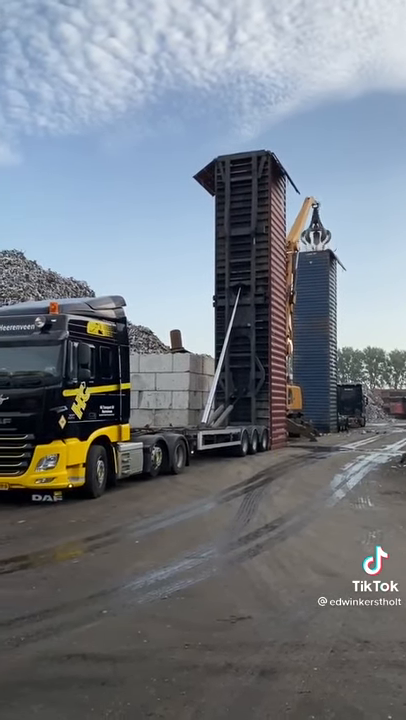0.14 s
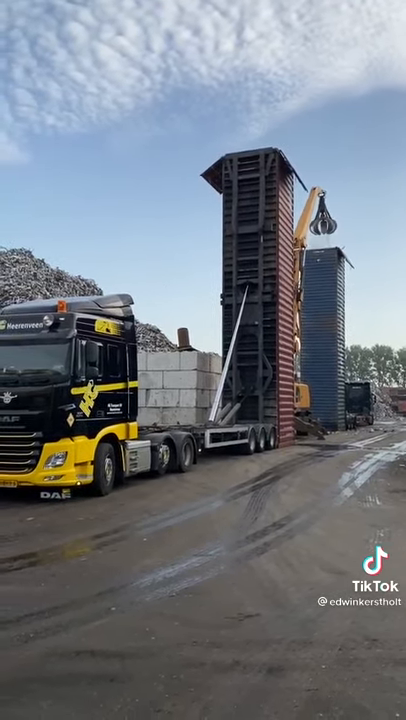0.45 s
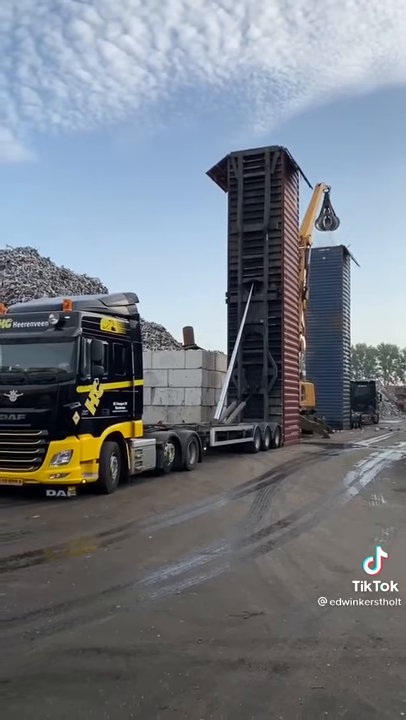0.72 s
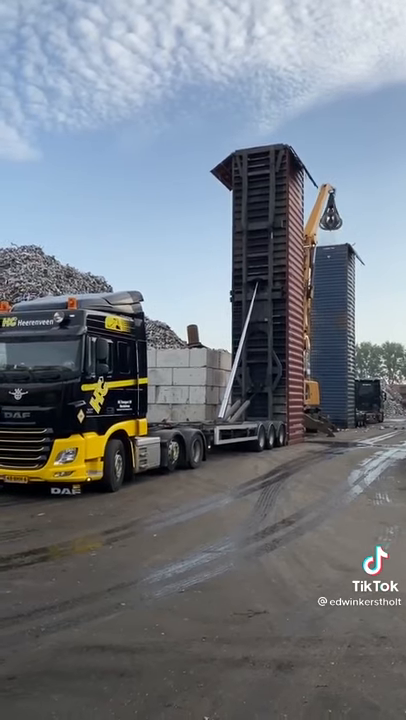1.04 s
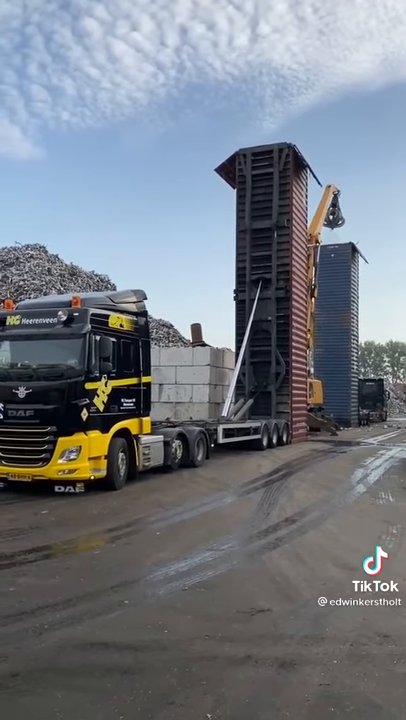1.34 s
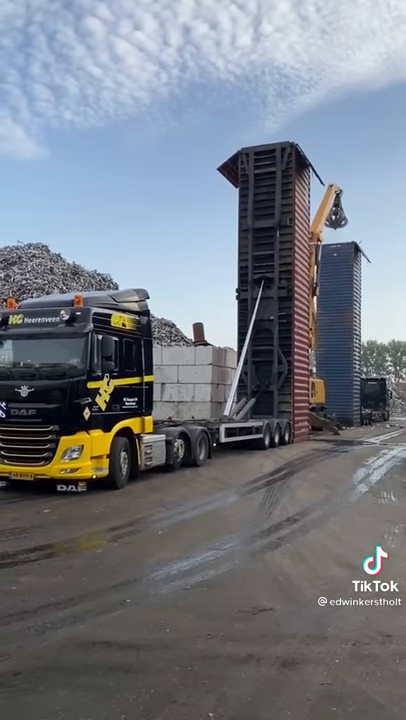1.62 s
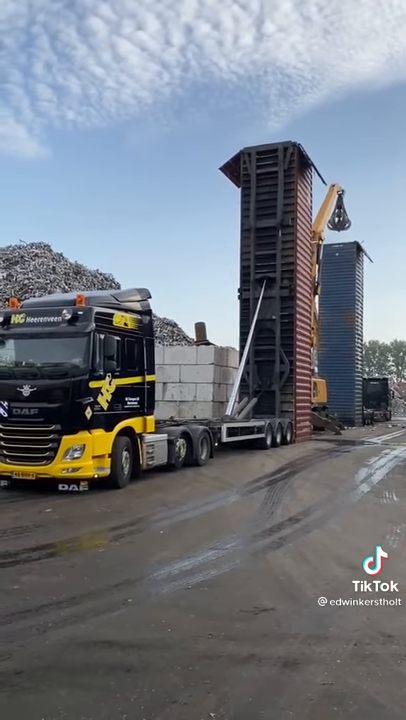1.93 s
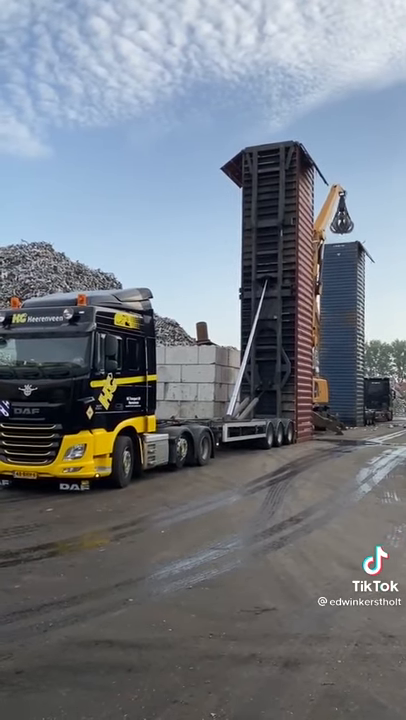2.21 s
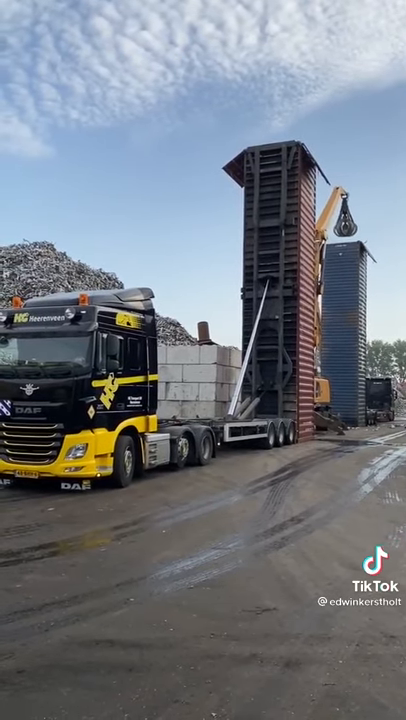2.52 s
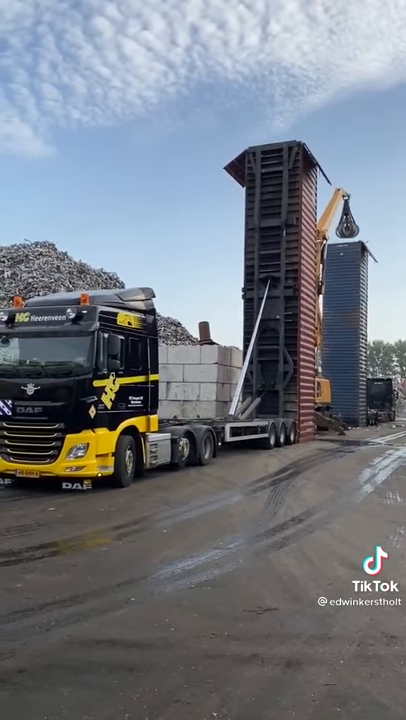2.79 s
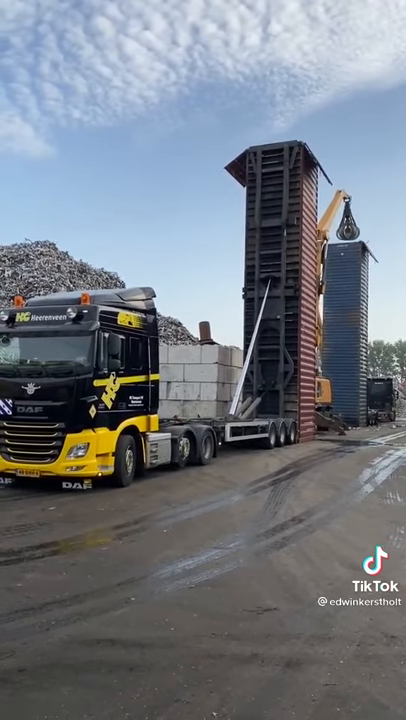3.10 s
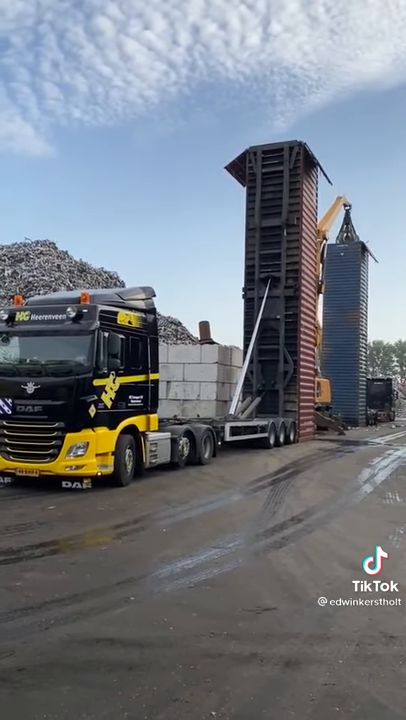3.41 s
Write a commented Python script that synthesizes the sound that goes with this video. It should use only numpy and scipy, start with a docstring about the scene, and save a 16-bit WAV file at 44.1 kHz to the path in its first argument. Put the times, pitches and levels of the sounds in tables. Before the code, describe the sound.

Scrap metal crashes in a tall hollow steel container at about 0.9 seconds: three rapid clattering blows to 1.1, with sharp clinks, a strong clang and low boom, then stragglers to 1.3 and a yard echo. Throughout, diesel engines drone and rumble with a faint fan tone under hiss that swells and sinks, strongest near the start and 3.4. Dull low bumps come around 2.0 and 2.4. Outdoor phone pickup.

```python
"""A scrapyard: diesel engines drone under a hiss that swells and sinks, probably a crane's hydraulics.
Just before one second, scrap tumbles in an upended steel container: three clattering, booming blows,
hard clinks and a few stragglers, made of noise bursts and decaying tones. The yard echoes.
From about two seconds the machines add dull low bumps.
Two closely spaced microphone ports hear nearly all of it from one side."""
import sys
import numpy as np
from scipy import signal
from scipy.fft import rfft, irfft, next_fast_len
from scipy.io import wavfile
from scipy.ndimage import uniform_filter1d, map_coordinates

SR = 44100
rng = np.random.default_rng(int(sys.argv[2]) if len(sys.argv) > 2 else 0)


def wrap_up_sound(samples):
    """Save the sound to the file named by the first command line argument, as 16-bit audio."""
    columns = np.atleast_2d(samples).T
    # keep every value between -1 and 1, then stretch to whole-number steps
    tamed = np.clip(columns, -1, 1)
    steps = np.round(tamed * 32767).astype(np.int16)
    wavfile.write(sys.argv[1], SR, steps)


N = 156555  # length in samples


def amp(db):
    """Decibels to gain."""
    return 10 ** (np.asarray(db) / 20)


def unit(x):
    """Scale to rms 1."""
    return x / np.sqrt(np.mean(x ** 2) + 1e-20)


def along(points, hz):
    """Read a curve of (Hz, value) points on a log frequency axis."""
    point_hz, values = np.transpose(points)
    return np.interp(np.log(hz + 1), np.log(point_hz + 1), values)


def curves(rows):
    """One value per sample for each column after the time."""
    seconds, *columns = np.transpose(rows)
    return [np.interp(np.arange(N) / SR, seconds, column) for column in columns]


def wobble(rate):
    """A smooth random curve with this many knots a second."""
    coarse = np.arange(0, N + 64, 64)
    knots = rng.standard_normal(400)
    curve = map_coordinates(knots, [coarse * rate / SR], mode="mirror")
    return np.interp(np.arange(N), coarse, curve)


def filtered(x, response):
    """Multiply the spectrum of x by a complex response of frequency."""
    size = next_fast_len(N + SR // 2)
    spectrum = rfft(x, size) * response(np.fft.rfftfreq(size, 1 / SR))
    return irfft(spectrum, size)[..., :N]


def tilt(hz):
    """Left and right gains at equal total power."""
    # Each row: frequency in Hz, left minus right in dB.
    balance = [(110, 0), (200, -3.2), (350, -9), (680, -2.5), (1250, 0), (2300, -1), (7000, 0)]
    gains = amp(np.array([[.5], [-.5]]) * along(balance, hz))
    return gains / np.sqrt(np.mean(gains ** 2, axis=0))


def ports(x):
    """Phase and level differences between the two ports."""
    # Each row: frequency in Hz, lead of the left port in radians.
    left_lead = [(100, 0), (180, -.3), (340, -1), (460, -2.1), (750, -3.4), (1300, -4.2), (2900, -4.6),
                 (3600, -5.9), (5300, -6.2), (6500, -3.3), (7900, -3.2), (9200, -5.2), (12000, -6.2),
                 (14000, -5.5)]

    def response(hz):
        return np.exp(np.array([[.5j], [-.5j]]) * along(left_lead, hz)) * tilt(hz)

    return filtered(x, response)


def diffuse(pair):
    """Mix two unrelated signals into one partly coherent sound field at the ports."""
    # How alike the ports sound. Each row: frequency in Hz, coherence from 0 to 1.
    coherence = [(110, 1), (200, .95), (330, .72), (440, .2), (620, .5), (820, .7), (1300, .45), (1800, .3),
                 (2400, .6), (4200, .65), (5100, .8), (6000, .55), (7200, .55), (9000, .4), (12000, .6)]

    def shares(hz):
        turn = np.arccos(np.clip(along(coherence, hz), 0, 1)) / 2
        return np.array([np.cos(turn), np.sin(turn)])

    common, opposed = filtered(pair, shares)
    return ports(np.array([common + opposed, common - opposed]))


def noise(spectrum, patchy_db):
    """Stereo noise of rms 1, with patches of random gain over time and frequency."""
    cells = signal.stft(rng.standard_normal((2, N)), nperseg=512)[2]
    patches = uniform_filter1d(rng.standard_normal(cells.shape[1:]), size=5, axis=0)
    patches = uniform_filter1d(patches, size=12, axis=1)
    pair = signal.istft(cells * amp(patchy_db * unit(patches)), nperseg=512)[1][:, :N]
    colored = filtered(pair, lambda hz: amp(along(spectrum, hz)))
    return unit(diffuse(colored))


def engines():
    """Unsteady engine tones, a fan tone and low rumble over the yard's broadband roar."""
    # Low engine tones. Each row: frequency in Hz, rms level in dB.
    low_tones = [(55, -45), (85, -45), (108.5, -48.5)]
    # Strongest engine tone. Each row: time in seconds, rms level in dB.
    hum_level = [(.12, -49.5), (.25, -37.5), (.7, -39.5), (1.5, -46.5), (1.7, -39), (2.0, -46.5),
                 (2.7, -39.5), (3.0, -47), (3.17, -36.5), (3.55, -41.5)]
    # Fan tone. Each row: time in seconds, level before the trim in dB.
    fan_level = [(0, -42.5), (.55, -48), (.7, -38.5), (.82, -32), (.92, -47), (1.2, -44), (2.2, -41.5),
                 (2.4, -37), (2.75, -32), (2.87, -40.5), (3.55, -42)]
    # Rumble. Each row: time in seconds, level before the trim in dB.
    rumble_level = [(0, -36), (.4, -34), (.65, -39), (.92, -29.5), (1.15, -36), (1.5, -44), (1.68, -30),
                    (1.85, -40), (2.0, -37), (2.22, -35), (2.42, -39), (2.6, -29.5), (3.0, -39.5),
                    (3.55, -36.5)]
    # Color of the rumble. Each row: frequency in Hz, relative density in dB per Hz.
    rumble_color = [(15, -21), (32, -2), (55, 9.5), (90, 2), (130, 1.5), (250, -2), (500, -44)]
    # The yard's roar. Each row: time in seconds, rms level in dB.
    roar_level = [(0, -29.5), (.6, -33), (1.5, -32), (2.3, -29.5), (2.95, -33.5), (3.5, -31)]
    # Color of the roar. Each row: frequency in Hz, relative density in dB per Hz.
    roar_color = [(20, -11), (40, -6), (100, 2), (200, -0.5), (340, 0.5), (430, -6), (560, -2.5), (800, -4),
                  (1100, -4), (1700, -14.5), (2500, -13), (4000, -30.5), (6000, -87.5), (9000, -48.5),
                  (14000, -35)]
    hum_hz, fan_hz = 163, 308.3
    speed_drift, fan_drift = 0.0089, 0.00473  # shares of speed
    fan_trim_db, fan_flutter_db, rumble_trim_db = 0.5, 1.5, -3.5

    # the engine tones share one drifting clock
    clock = np.cumsum(1 + speed_drift * wobble(5.1)) / SR
    drone = np.zeros(N)
    for hz, db in low_tones:
        level = amp(db + 1.9 * wobble(5.9))
        drone += level * np.sin(2 * np.pi * (hz * clock + rng.random()))
    hum = amp(curves(hum_level)[0]) * np.sin(2 * np.pi * hum_hz * clock)

    fan_phase = 2 * np.pi * np.cumsum(fan_hz * (1 + fan_drift * wobble(7.6))) / SR
    fan_db = curves(fan_level)[0] + fan_trim_db + fan_flutter_db * wobble(12)
    fan = amp(fan_db) * np.sin(fan_phase)

    rumble = amp(curves(rumble_level)[0] + rumble_trim_db) * noise(rumble_color, patchy_db=1.0)
    roar = amp(curves(roar_level)[0]) * noise(roar_color, patchy_db=1.76)
    tones = np.sqrt(2) * (drone + hum + fan)  # turns rms levels into sine peaks
    return ports(tones) + rumble + roar


def hiss():
    """A midrange rush and a treble hiss, two bands of noise that swell and sink together."""
    # Each row: time in seconds, level of the rush and level of the treble, both before trims in dB.
    swells = [(0, -37, -35), (.1, -35, -36), (.28, -35, -39.5), (.42, -39.5, -43), (.62, -48.5, -46.5),
              (.85, -44.5, -47), (1.42, -50.5, -46.5), (1.58, -38, -42.5), (1.74, -34, -39.5),
              (1.95, -39.5, -44.5), (2.08, -38, -41.5), (2.32, -46.5, -46), (2.53, -37, -42.5),
              (2.8, -45, -48.5), (3.12, -38.5, -41), (3.295, -39, -44), (3.32, -34, -37),
              (3.43, -32, -33.5), (3.55, -35.5, -38)]
    # Color of the rush. Each row: frequency in Hz, relative density in dB per Hz.
    rush_color = [(200, -10.5), (600, -3.5), (1200, -1), (1750, -2), (2300, 1.5), (3000, -1.5),
                  (3800, -7.5), (6000, -53), (15000, -110)]
    # Color of the treble. Each row: frequency in Hz, relative density in dB per Hz.
    treble_color = [(1500, -30), (3100, -3), (4200, 0), (5200, 1), (6300, 1.5), (7200, -22), (8200, -5),
                    (9500, -11), (11000, -14.5), (14000, -19.5)]
    rush_trim_db, treble_trim_db, treble_flutter_db = 3.5, 1.5, 0.4

    rush_db, treble_db = curves(swells)
    rush = amp(rush_db + rush_trim_db) * noise(rush_color, patchy_db=2)
    treble_db = treble_db + treble_trim_db + treble_flutter_db * wobble(21.85)
    return rush + amp(treble_db) * noise(treble_color, patchy_db=2.0)


def ring(modes, t, clock, blur, scatter_db):
    """Decaying modes pitched by the clock's pace; rattling pieces make strength and phase wander."""
    out = np.zeros((2, len(t)))
    for hz, db, t60, left_lead in modes:
        phase = 2 * np.pi * (hz * clock + rng.random()) + blur * wobble(57.0)[:len(t)]
        level = amp(db + scatter_db * wobble(57.0)[:len(t)] - 60 * t / t60)
        out += level * np.sin(phase + left_lead * np.array([[.5], [-.5]]))
    return out


def contact_spikes():
    """Random contacts of uneven strength, each a jump that dies away; their powers add up."""
    contacts = (rng.random(N) < 500 / SR) * amp(2 * rng.standard_normal(N))  # about 500 a second
    keep = np.exp(-1 / (0.019 * SR))  # power fades with a 19 ms time constant
    return unit(np.sqrt(signal.lfilter([1], [1, -keep], contacts ** 2)))


def crash():
    """Heaps of contacts: heavy pieces thud, loose ones clatter and spray, wall and hollow ring."""
    # Falling scrap. Each row: start in seconds, then levels in dB of thud, clatter, wall ring, clang
    # and boom, spread of the contacts in seconds, clang pitch as a ratio.
    blows = [(.888, -19.5, -21.5, -26, -26, -36, .035, 0.93),
             (.907, -38, -24, -27.5, -36, -33, 0.037, 1.03),
             (.96, -23, -20.5, -21.5, -19, -23.5, .03, .985), (1.0, -26, -25, -31, -24.5, -34, 0.041, .975),
             (1.054, -23, -21.5, -20, -10.5, -25, 0.019, 1.005),
             (1.14, -32, -33.5, -31, -35, -31.5, 0.028, .96),
             (1.291, -38, -37.5, -38, -33.5, -44, 0.042, 0.95)]
    # Container wall. Each row: mode in Hz, relative level in dB, t60 in seconds, left lead in radians.
    wall_modes = [(602, -3.5, 0.15, -2.5), (796, -10, 0.11, 5), (877, -8, 0.21, 4), (1225, -14, .2, -2),
                  (1300, -16, 0.2, 5), (1391, -8.5, .16, 1.5), (1600, -11, 0.11, 4),
                  (1727, -9.5, 0.28, -1.5), (1800, -11.5, 0.23, 1), (1955, -15.5, 0.22, 2.5),
                  (2135, -7, 0.19, 1.5), (2197, -9, 0.3, 2.5), (2590, -13, 0.3, 1.5)]
    # The wall's strongest mode, which each blow stirs differently. Each row: frequency in Hz before
    # pitch ratio and sag, relative level in dB, t60 in seconds, left lead in radians.
    clang_mode = [(983, -1, .17, -1.45)]
    # Air in the container. Each row: mode in Hz, relative level in dB, t60 in seconds,
    # left lead in radians.
    air_modes = [(141.5, -2, 0.55, -.25), (233, -4, 0.33, -0.82), (264.3, -1.5, 0.41, -0.63),
                 (278, -9.5, 0.74, -1.05), (335.3, -3, 0.34, -0.78)]
    # Color of heavy pieces. Each row: frequency in Hz, relative density in dB per Hz.
    thud_color = [(50, -25), (130, -8), (270, 0), (370, -1), (460, -12.5), (610, -2), (800, -16),
                  (1200, -27), (4000, -63)]
    # Color of loose pieces. Each row: frequency in Hz, relative density in dB per Hz.
    scrap_color = [(150, -27), (450, -12), (620, 2.5), (850, 1), (1120, 1), (1400, -3.5), (2200, -5.5),
                   (3000, -21), (4200, -31), (8000, -61)]
    # Color of fine shreds. Each row: frequency in Hz, relative density in dB per Hz.
    spray_color = [(1200, -20), (3100, 3.5), (4200, -4), (5600, -3), (7200, -45), (9000, -17), (14000, -35)]
    rise_s, contact_t60, spray_db = .008, 0.14, -12.5
    # the clang's pitch sinks from settled + sag to settled, with this time constant in seconds
    sag, sag_s, settled = .05, 0.097, 0.95

    power, steel = np.zeros((2, N)), np.zeros((2, N))
    for start, thud_db, clatter_db, ring_db, clang_db, boom_db, spread, pitch in blows:
        t = np.maximum(np.arange(N) / SR - start, 0)
        rise = 1 - np.exp(-t / rise_s)
        fall_db = 60 * np.maximum(t - spread, 0) / contact_t60
        power += (rise * amp(np.array([[thud_db], [clatter_db]]) - fall_db)) ** 2

        span = slice(int(start * SR), int(start * SR) + SR)  # the steel gets one second
        t = t[span]
        sinking = pitch * (settled * t + sag * sag_s * (1 - np.exp(-t / sag_s)))
        fading = np.maximum(t - spread, 0)  # the steel only dies away once the contacts stop
        wall = amp(ring_db) * ring(wall_modes, fading, t, blur=0.34, scatter_db=3)
        clang = amp(clang_db) * ring(clang_mode, fading, sinking, blur=0.24, scatter_db=3.5)
        boom = amp(boom_db) * ring(air_modes, fading, t, blur=0.21, scatter_db=0.5)
        steel[:, span] += rise[span] * (wall + clang + boom)

    thud, clatter = np.sqrt(power)
    heavy = noise(thud_color, patchy_db=3.0)
    loose = noise(scrap_color, patchy_db=3.5) + amp(spray_db) * noise(spray_color, patchy_db=2)
    return thud * heavy + clatter * contact_spikes() * loose + filtered(steel, tilt)


def clinks():
    """Single pieces of steel strike hard and ring briefly, with one rough overtone."""
    # Each row: start in seconds, pitch in Hz, starting level of the main tone in dB.
    strikes = [(.907, 3220, -25), (0.928, 3170, -24.5), (.964, 2343, -23)]
    t60 = 0.035  # s
    out = np.zeros(N)
    for start, hz, db in strikes:
        t = np.maximum(np.arange(N) / SR - start, 0)
        phase = 2 * np.pi * hz * t + 0.44 * wobble(300)
        tone = np.sin(phase) + 0.19 * np.sin(1.42 * phase)
        out += (t > 0) * amp(db - 60 * t / t60) * tone
    return ports(out)


def echo(x):
    """The yard's answer: a tail of noise in which each frequency dies at its own speed."""
    # Each row: frequency in Hz, t60 in seconds.
    decay = [(100, 1), (500, 0.74), (1000, 0.57), (2200, 1), (10000, 0.1)]
    hz, t, cells = signal.stft(rng.standard_normal((2, SR)), SR, nperseg=256)
    fading = amp(-60 * t / along(decay, hz)[:, None])
    tail = signal.istft(cells * fading, SR, nperseg=256)[1]
    tail = tail / np.linalg.norm(tail[0])
    late = np.pad(x, (SR // 50, 0))[None]  # 20 ms later
    return diffuse(signal.fftconvolve(late, tail, axes=1)[:, :N])


def bumps():
    """Dull bumps from the machines: short low pushes with no ring, equal at both ports."""
    # Each row: start in seconds, peak of the envelope in dB.
    pushes = [(1.959, -23), (2.352, -24.5), (2.409, -21), (2.496, -29), (2.538, -28)]
    bump_hz, peak_s = 94, 0.0071  # pitch, time to the envelope's peak
    out = np.zeros(N)
    for start, db in pushes:
        t = np.maximum(np.arange(N) / SR - start, 0)
        envelope = t / peak_s * np.exp(1 - t / peak_s)
        out -= amp(db) * envelope * np.sin(2 * np.pi * bump_hz * t)
    return out


def scene():
    """The crash and its echo over the running machines."""
    echo_db = -11
    scrap = crash() + clinks()
    answer = amp(echo_db) * echo(scrap[1])  # fed by the right port
    return scrap + answer + engines() + bumps() + hiss()


def record(dry):
    """The phone rounds off the highest peaks and keeps nothing above its band limit."""
    ceiling, top_hz = .7, 14200  # ceiling as a share of full scale
    rounded = dry / (1 + (dry / ceiling) ** 6) ** (1 / 6)
    return filtered(rounded, lambda hz: hz < top_hz)


dry = scene()
out = record(dry)
wrap_up_sound(out)
```